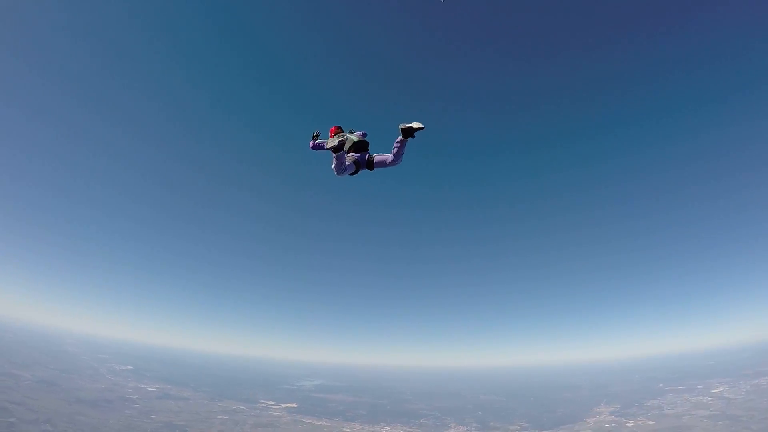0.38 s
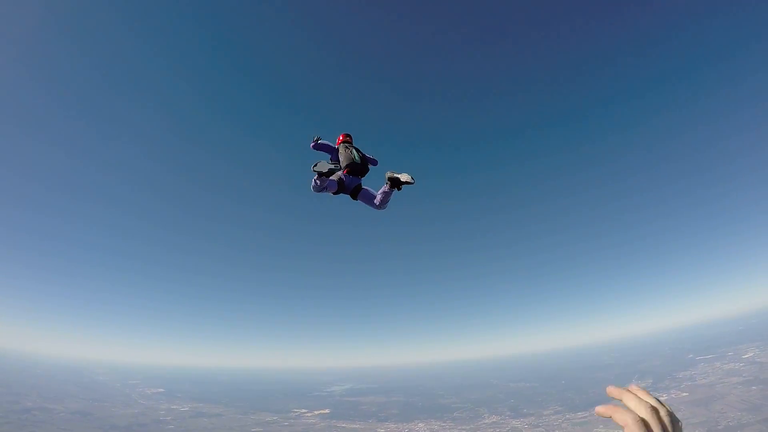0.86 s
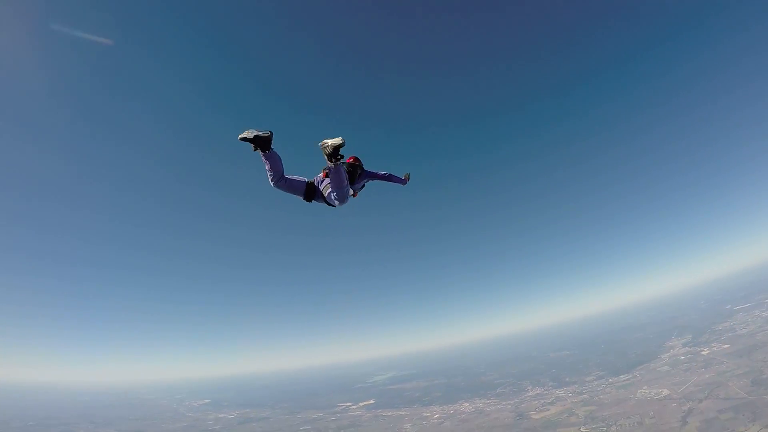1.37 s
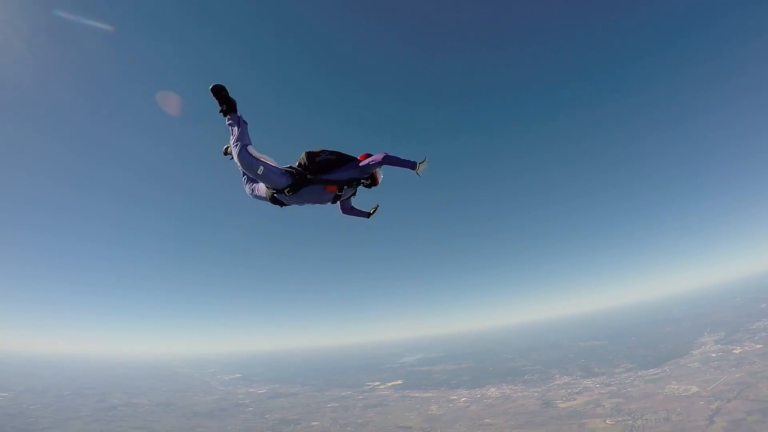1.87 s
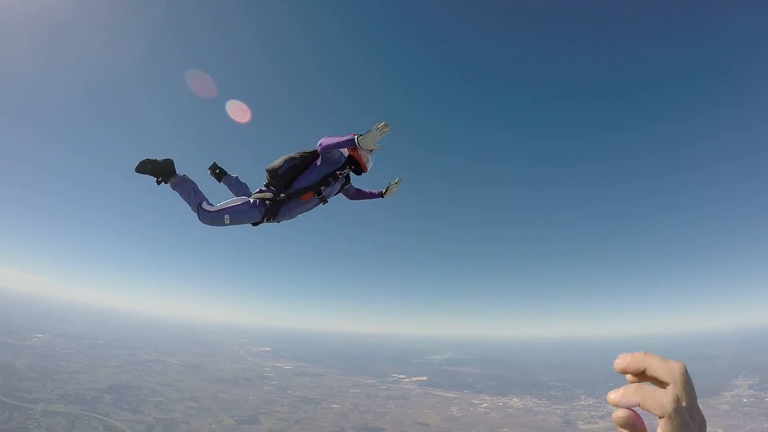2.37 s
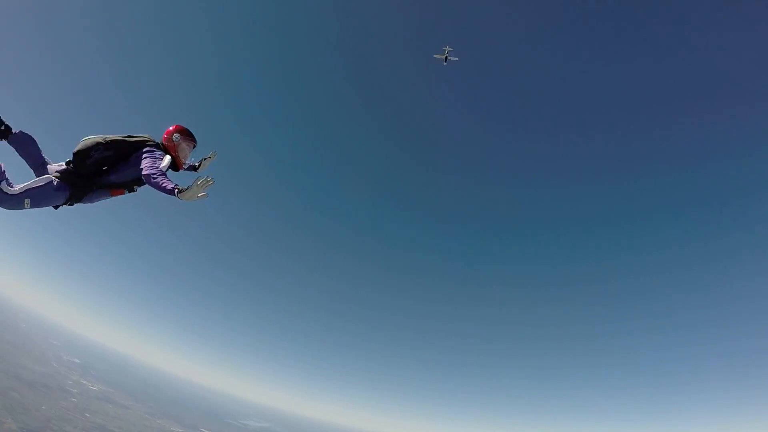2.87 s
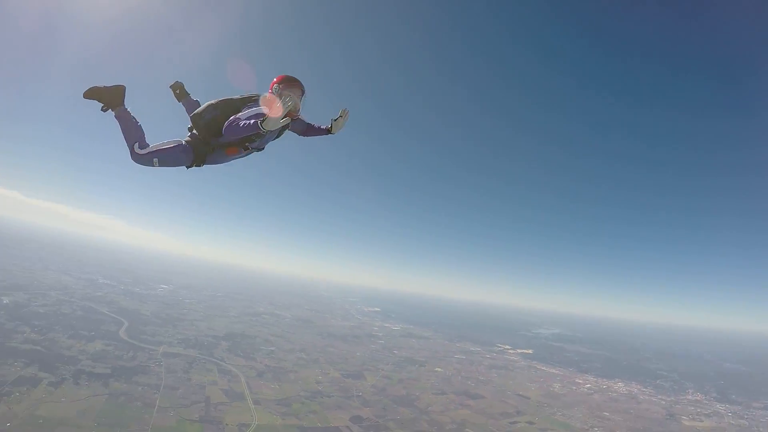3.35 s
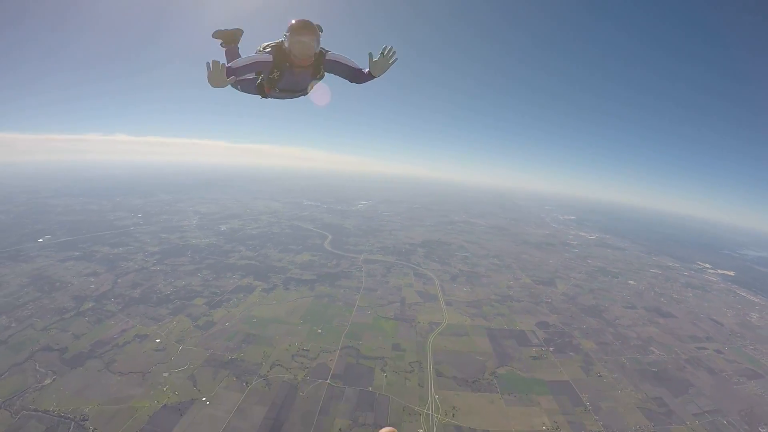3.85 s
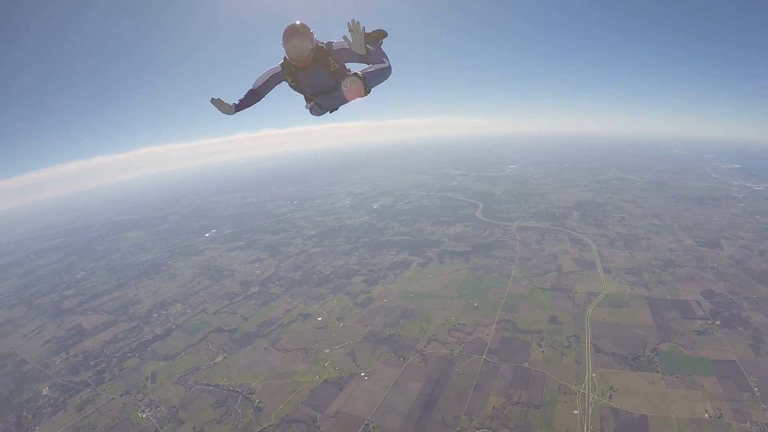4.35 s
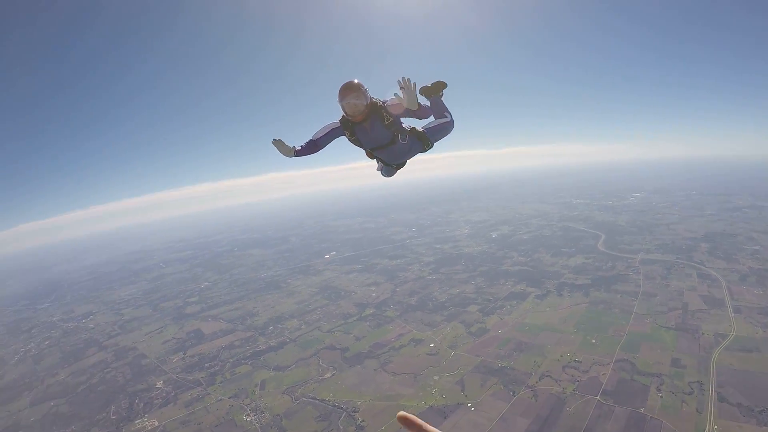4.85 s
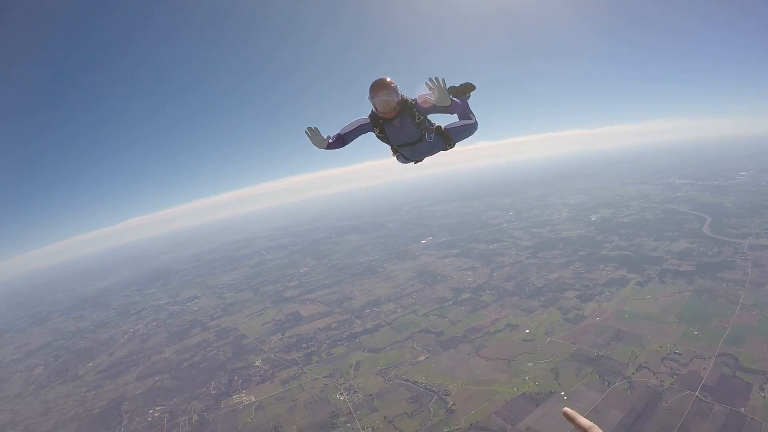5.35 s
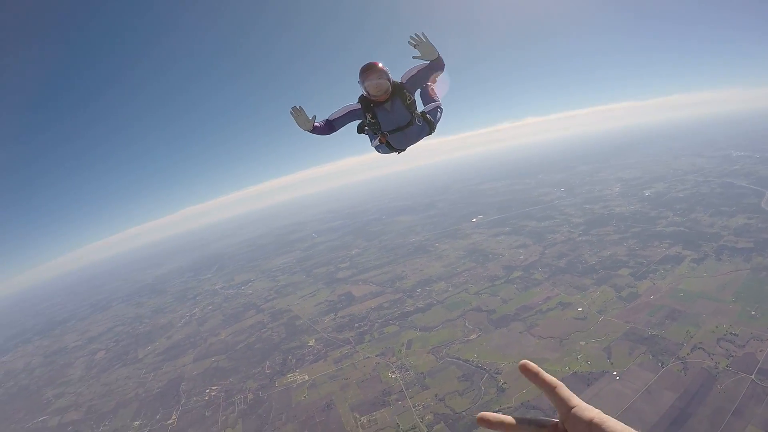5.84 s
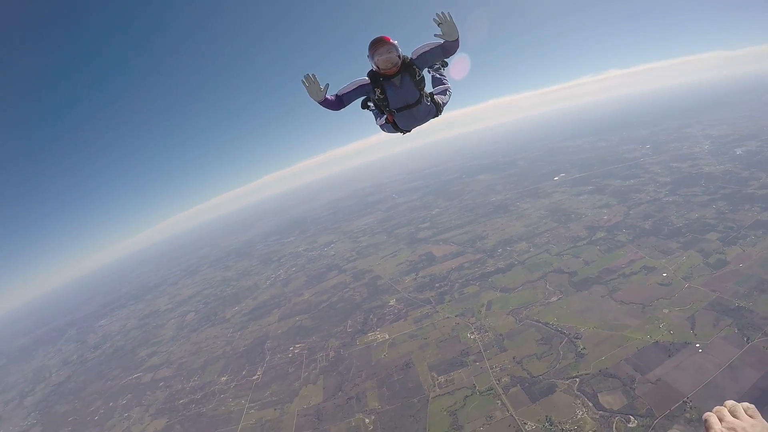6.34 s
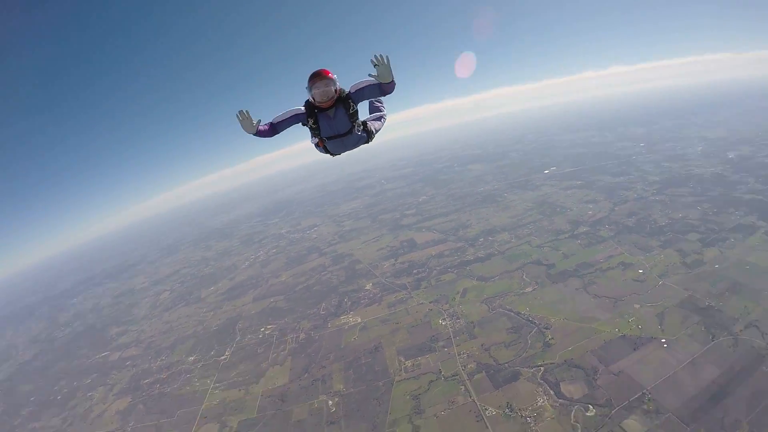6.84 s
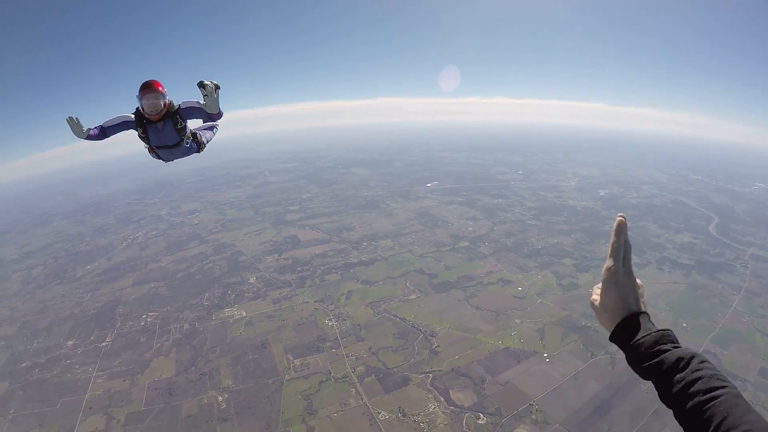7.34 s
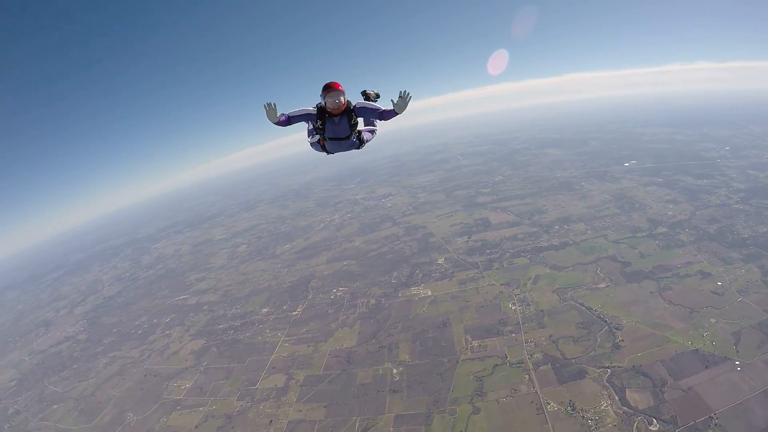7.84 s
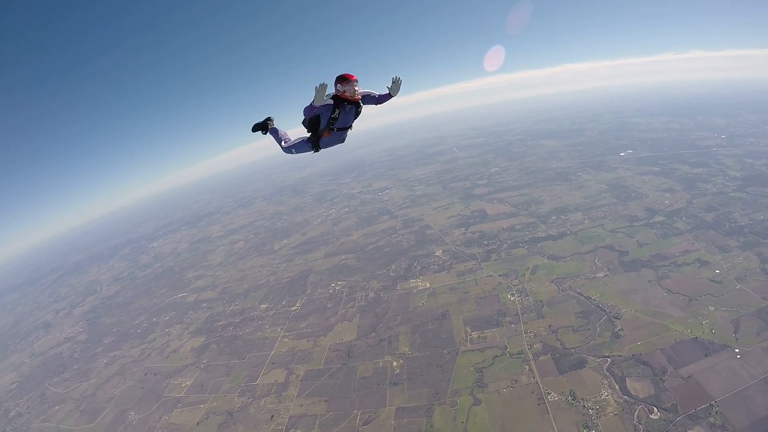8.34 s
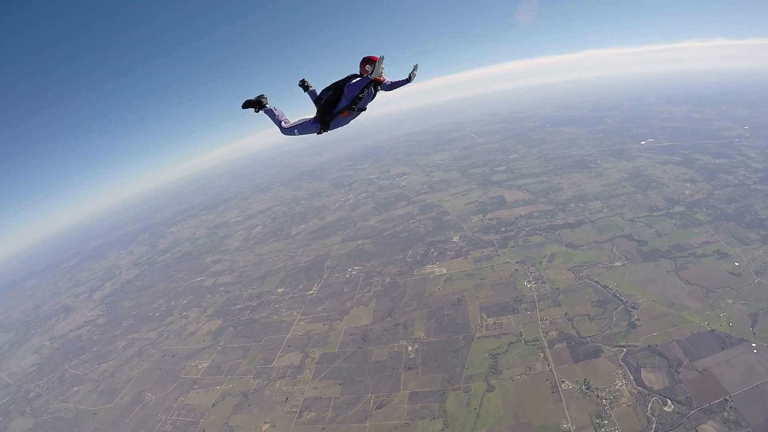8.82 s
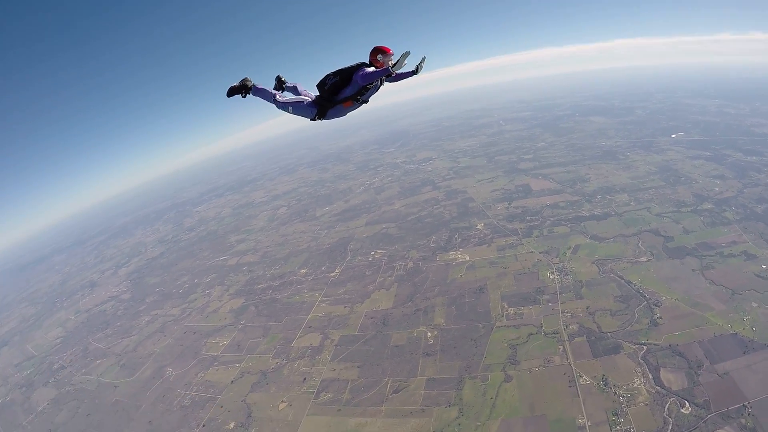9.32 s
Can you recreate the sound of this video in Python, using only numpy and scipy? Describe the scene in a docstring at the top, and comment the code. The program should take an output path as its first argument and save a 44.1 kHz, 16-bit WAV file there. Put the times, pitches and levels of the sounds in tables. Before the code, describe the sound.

Air at full falling speed pounds a close, unprotected microphone high in the open sky. A heavy low rumble carries a fluttering roar, rough midrange rush and fine hiss. The first second is fullest and brightest; a weaker spell follows, then gusts return. Short popping bursts crowd together throughout, with a sharp tearing peak near four seconds and no echo.

```python
"""Freefall: air at full speed tears over a helmet microphone. The stream begins strong, weakens after about
0.9 s, recovers near 2 s, then rises and sinks to the end, with brief calms all along. Noise shaped by random
eddies gives a deep rumble, a ragged roar and rush and a thin hiss; eddies breaking on the port add short
broadband bursts, the loudest tearing near 4 s. The preamplifier rounds off the largest swings."""
import sys
import numpy as np
from scipy import signal
from scipy.fft import rfft, irfft, next_fast_len
from scipy.io import wavfile
from scipy.ndimage import uniform_filter1d, map_coordinates

SR = 44100
rng = np.random.default_rng(int(sys.argv[2]) if len(sys.argv) > 2 else 0)


def transcribe(signal):
    """Save signal, clipped to [-1, 1], as a 16-bit WAV file at the path in sys.argv[1]."""
    frames = np.atleast_2d(signal).T
    limited = np.clip(frames, -1, 1)
    pcm = np.round(limited * 32767).astype(np.int16)
    wavfile.write(sys.argv[1], SR, pcm)


def volts_from_db(level):
    """Convert decibel levels to linear amplitude ratios."""
    exponent = np.asarray(level, float) / 20
    return 10 ** exponent


N = 416744  # samples


def unit(x):
    """Normalisation: the mean square is brought to 1."""
    return x / np.sqrt(np.mean(x ** 2) + 1e-20)


def wobble(rate):
    """Band-limited fluctuation: a smooth curve through random knots, rate of them a second."""
    knots = rng.standard_normal(int(N * rate / SR) + 4)
    return map_coordinates(knots, [np.arange(N) * rate / SR])


def along(rows):
    """Linear interpolation: one value per sample for each column after the time."""
    s, *columns = np.transpose(rows)
    return [np.interp(np.arange(N) / SR, s, column) for column in columns]


def ragged(shared, shared_db, own_db, own_rate):
    """Intermittency: a gain of rms 1 follows the common eddies and flutters on its own."""
    return unit(volts_from_db(shared_db * shared + own_db * wobble(own_rate)))


def turbulence(spectrum, envelope, jumps=0):
    """Spectral shaping: enveloped white noise plus jumps is filtered; rms 1 where the envelope is 1."""
    m = next_fast_len(N + 8192)
    hz, db = np.transpose(spectrum)
    log_hz = np.log(np.fft.rfftfreq(m, 1 / SR) + 1)
    gain = volts_from_db(np.interp(log_hz, np.log(hz + 1), db))
    source = envelope * rng.standard_normal(N) + jumps
    return irfft(rfft(source, m) * unit(gain), m)[:N]


# airstream on the port: t/s, strength/dB (its departure from the mean counts), hiss level/dB
FLOW = [(0.0, -20, -50), (0.13, -15.5, -47.5), (0.5, -15, -45), (0.79, -17, -49), (0.97, -27.5, -52),
        (1.13, -29.5, -58), (1.5, -30.5, -54.5), (1.76, -33, -55.5), (1.95, -25, -53.5),
        (2.08, -21.5, -49.5), (2.16, -19.5, -49.5), (2.37, -19, -48.5), (2.66, -25.5, -51),
        (2.82, -24.5, -50), (2.97, -32, -51), (3.1, -20.5, -47), (3.29, -25, -51), (3.55, -28, -50.5),
        (3.97, -19.5, -47.5), (4.13, -26.5, -52), (4.37, -23.5, -52.5), (4.71, -25, -50.5),
        (5.45, -19, -46.5), (5.69, -25, -49), (6.0, -25, -49.5), (6.34, -22.5, -49), (6.5, -27.5, -50.5),
        (7.0, -23, -49.5), (7.19, -22, -49.5), (7.95, -24, -49.5), (8.29, -30.5, -52.5), (8.89, -24.5, -50),
        (9.05, -24.5, -48.5), (9.45, -27.5, -51)]


def flow():
    """Common excitation: strength about its mean drives all layers but the hiss, which has its own level."""
    strength_db, hiss_db = along(FLOW)
    return strength_db - strength_db.mean(), hiss_db


# brief calms between eddies: middle t/s, depth/dB, length/s (width near half depth)
LULLS = [(0.017, -12.5, 0.011), (0.193, -4, 0.12), (0.421, -1.5, 0.051), (1.047, -3.5, 0.038),
         (1.137, -10, 0.024), (1.253, -5, 0.029), (1.869, -7, 0.054), (2.098, -6, 0.023),
         (2.381, -10.5, 0.024), (2.459, -9, 0.021), (2.528, -9, 0.013), (2.755, -4.5, 0.045),
         (3.097, -7, 0.094), (3.349, -13, 0.012), (3.443, -4, 0.013), (3.738, -12, 0.0094),
         (3.871, -4.5, 0.015), (4.192, -3, 0.034), (4.354, -5.5, 0.029), (4.449, -10, 0.026),
         (4.538, -6, 0.045), (4.762, -10, 0.023), (4.925, -10, 0.018), (5.184, -4, 0.015),
         (5.226, -8, 0.034), (5.512, -5.5, 0.074), (6.043, -5.5, 0.047), (6.355, -9.5, 0.021),
         (6.438, -1.5, 0.033), (6.61, -3.5, 0.044), (6.982, -8.5, 0.034), (7.172, -10, 0.0088),
         (7.2, -4, 0.014), (7.386, -5.5, 0.07), (7.432, -7, 0.025), (7.734, -10, 0.013),
         (7.968, -6.5, 0.017), (8.075, -12, 0.028), (8.165, -5, 0.018), (8.807, -4, 0.043),
         (9.346, -11, 0.014)]


def lulls():
    """Flow separation: the stream detaches from the port for a moment, a smooth dip in dB."""
    dip_db, t = np.zeros(N + SR), np.arange(-SR // 8, SR // 8) / SR
    for s, db, length in LULLS:
        dip = db * np.exp(-np.abs(1.73 * t / length) ** 3)
        dip_db[round(s * SR):][:len(t)] += dip
    return dip_db[SR // 8:][:N]


def follow(gust_db, swell, mean_db, slope, swell_db):
    """Power law: level at mean strength, dB per dB of strength, depth of the shared random swells in dB."""
    return mean_db + slope * gust_db + swell_db * swell


def ticks(count, rise, fall):
    """Shot noise: many small eddies at random moments, mostly weak, give a spiky curve with sharp fronts."""
    when, size = rng.random((count, 2)).T
    train = np.bincount((when * N).astype(int), -np.log(1 - size), N)
    t = np.arange(SR // 30) / SR
    pulse = np.exp(-t / fall) - np.exp(-t / rise)
    spiky = signal.fftconvolve(train, pulse)[:N]
    return unit(spiky - spiky.mean())


def eddy_lumps():
    """Eddy cascade: slow and fast fluctuations add up to lumps shared by all scales."""
    slow = 0.37 * wobble(25) + 0.5 * wobble(70)
    fast = 0.98 * wobble(200) + 1.06 * ticks(count=1500, rise=0.00056, fall=0.00086)
    return 2.26 * np.tanh(unit(slow + fast) / 1.55)  # the background lumps stay below the big bursts


# colour of the hiss: f/Hz, relative level/dB
HISS = [(2000, -7.5), (3200, -2), (5000, -2.5), (7300, -6.5), (8500, -12.5), (11000, -17), (14500, -23),
        (15600, -27)]


def hiss(hiss_db, calm_db, eddies, sizzle):
    """Fine-scale turbulence: the smallest eddies give a thin hiss, less affected by calms."""
    level_db = hiss_db + 0.5 + 0.52 * calm_db
    steady = volts_from_db(level_db) * ragged(eddies, 1.2, 0.45, 150)
    return turbulence(HISS, np.hypot(steady, sizzle))


# level of the brighter edge, most of all just after the exit: t/s, edge re rush/dB
EDGE_SHARE = [(0, -12), (.3, -5), (.5, -12.5), (.7, -10.5), (.95, -13.5), (1.5, -16), (2.3, -14), (3, -18),
              (3.8, -13.5), (5, -19), (6.5, -16.5), (8, -18.5), (9.45, -17)]
# colour of the edge: f/Hz, relative level/dB
EDGE = [(900, -35), (1350, 6), (2100, -4), (2600, -27), (3300, -47), (4500, -100)]


def edge(rush_db, eddies, wake):
    """Intermittent shear noise: the brighter edge of the rush, strongly modulated by the eddies."""
    share_db, = along(EDGE_SHARE)
    level = volts_from_db(share_db) * np.hypot(volts_from_db(rush_db), volts_from_db(-7.5) * wake)
    return turbulence(EDGE, level * ragged(eddies, 6.8, 2.1, 100))


# colour of the rush: f/Hz, relative level/dB
RUSH = [(350, -75), (620, -3.5), (1090, -4.5), (1400, -13), (1900, -26.5), (2600, -80), (4500, -110)]


def rush(rush_db, eddies, wake, thud, thud_jump):
    """Mid-scale turbulence: stream and wake add in power, with part of each thud on top."""
    background = np.hypot(volts_from_db(rush_db), volts_from_db(-14) * wake) * ragged(eddies, 2.77, 1.44, 80)
    return turbulence(RUSH, np.hypot(background, volts_from_db(-5.5) * thud), volts_from_db(-6.5) * thud_jump)


# colour of the roar: f/Hz, relative level/dB
ROAR = [(70, -14), (125, -3), (300, -7.5), (600, -15), (850, -66), (1600, -85)]


def roar(roar_db, weight_db, eddies, wake, thud, thud_jump):
    """Turbulent pressure noise: a ragged roar carries the thuds of the breaking eddies."""
    background = np.hypot(volts_from_db(roar_db), volts_from_db(-6.5) * wake) * ragged(eddies, 2.82, 1.73, 35)
    envelope = volts_from_db(weight_db) * np.hypot(background, volts_from_db(3.5) * thud)
    return turbulence(ROAR, envelope, volts_from_db(weight_db + 4.0) * thud_jump)


# colour of the rumble: f/Hz, relative level/dB
RUMBLE = [(4.7, -35), (8.0, -3), (49, 4.5), (78, 1.5), (170, -12.5), (220, -27), (370, -120)]


def rumble(rumble_db, eddies, wake):
    """Large-scale buffeting: only the slow part of the eddies modulates the deep noise."""
    slow_eddies = uniform_filter1d(eddies, size=800)
    level = np.hypot(volts_from_db(rumble_db), volts_from_db(-2) * wake)
    return turbulence(RUMBLE, level * ragged(slow_eddies, 1.53, 0.44, 14))


# colour of the tearing: f/Hz, relative level/dB
TEARING = [(1200, 4.5), (1900, 8), (3000, 1.5), (4500, -7), (6000, -17.5), (9000, -74)]


def tearing(tear_db, eddies, high_wake, tear, tear_jump):
    """Small-scale breakup: bursts of broadband noise stand over a fluttering background."""
    background = np.hypot(volts_from_db(tear_db), high_wake) * ragged(eddies, 3.24, 2.2, 300)
    return turbulence(TEARING, np.hypot(background, tear), tear_jump)


def random_bursts(gust_db, count):
    """Random arrivals: a few more eddies at random moments, louder in a stronger stream."""
    when = rng.random(count) * (N - 1) / SR
    z = rng.standard_normal((count, 2))
    tear_db = -36 + gust_db[(when * SR).astype(int)]
    thud_re_tear_db = 13.5 + 3 * z[:, 0]
    length_s = 0.0104 * np.exp(1.06 * z[:, 1])
    return np.transpose([when, tear_db, thud_re_tear_db, length_s])


# eddies breaking on the port, strong and weak: front t/s, tear level/dB, thud re tear/dB, length/s
BURSTS = [(0.08, -37, 17, 0.0073), (0.1157, -24.5, 17.5, 0.0035), (0.1294, -39, 3, 0.0016),
          (0.1496, -30, 11, 0.0027), (0.174, -35, 18.5, 0.0036), (0.2693, -21.5, 11.5, 0.0023),
          (0.288, -27, -4, 0.0028), (0.293, -24.5, 17.5, 0.0034), (0.3155, -20.5, 8, 0.0038),
          (0.332, -27.5, 17.5, 0.0044), (0.349, -34, 9, 0.0076), (0.373, -26.5, 12, 0.0034),
          (0.387, -28, 11, 0.0046), (0.4055, -32, 15, 0.0046), (0.4609, -28, 5, 0.0022),
          (0.493, -29, 9, 0.0032), (0.512, -39, 9, 0.0025), (0.552, -22.5, 15, 0.0016),
          (0.565, -31, 17, 0.0044), (0.598, -23, 19, 0.0025), (0.622, -33, 22, .005),
          (0.6459, -26, 6, 0.0031), (0.655, -27.5, 5, 0.011), (0.6848, -32, 9, .005),
          (0.711, -29, 15, 0.0032), (0.7327, -30, 13, .004), (0.7916, -38, 11, 0.0029),
          (0.826, -32, 15, 0.0035), (0.8739, -27, 16.5, 0.0032), (0.899, -27.5, 14.5, 0.0041),
          (0.969, -29, 14.5, 0.0051), (0.9854, -29.5, 12, 0.0049), (1.07, -38, 11, .003),
          (1.1149, -32.5, 10, 0.0036), (1.1625, -33.5, 11, 0.00606), (1.279, -30.5, 13, 0.0049),
          (1.3, -35, 14, 0.0058), (1.3437, -33.5, 13, 0.0044), (1.3602, -26.5, 13.5, 0.0046),
          (1.396, -36, 10, 0.0051), (1.408, -37, 16.5, 0.0037), (1.479, -31, 13.5, 0.0041),
          (1.5234, -43, 14.5, 0.0057), (1.5434, -29, 13.5, 0.0049), (1.56, -37.5, 20, 0.0057),
          (1.58, -44, 17, 0.006), (1.695, -36, 13.5, 0.0042), (1.712, -43.5, 17, .005),
          (1.82, -33.5, 12, 0.0028), (1.9205, -35.5, 13, 0.0045), (1.955, -30, 12.5, 0.0065),
          (2.01, -24.5, 7, 0.0061), (2.0827, -31.5, 10, 0.0037), (2.155, -37, 6, 0.0058),
          (2.176, -23.5, 11.5, 0.0049), (2.2283, -30.5, 9, .006), (2.286, -24, 13, 0.0043),
          (2.32, -35, 10, 0.0076), (2.3665, -26, 12, 0.0024), (2.4026, -30.5, 17.5, 0.005),
          (2.4982, -34, 13, 0.0032), (2.5207, -33.5, 16.5, 0.0042), (2.5511, -36, 7, 0.0022),
          (2.58, -34.5, 19, 0.0055), (2.638, -29.5, 13, 0.0062), (2.66, -30, 16, 0.005),
          (2.68, -30.5, 14, .004), (2.7806, -35.5, 15.5, 0.0095), (2.828, -29, 11.5, 0.00434),
          (2.8863, -34, 10, 0.005), (2.976, -29.5, 15, 0.0059), (3.01, -27, 13.5, 0.01),
          (3.135, -32, 14, 0.004), (3.1702, -30, 8, 0.0032), (3.1961, -32.5, 16, 0.0028),
          (3.222, -37.5, 21, .007), (3.2784, -29, 18.5, 0.0019), (3.3159, -33.5, 17, 0.0048),
          (3.37, -27.5, 12, 0.0032), (3.4176, -29.5, 17, 0.0055), (3.484, -29.5, 8.5, 0.0082),
          (3.585, -34, 13.5, 0.0091), (3.6114, -33.5, 18.5, 0.0056), (3.6431, -30.5, 14.5, 0.0056),
          (3.685, -28.5, 12, 0.0065), (3.755, -32.5, 16.5, 0.0063), (3.8262, -32, 14, 0.0038),
          (3.8571, -35, 10, 0.0045), (3.897, -31, 13, 0.0053), (3.91, -33, 10, 0.0032),
          (3.932, -30, 13, 0.0038), (3.9459, -30, 16.5, 0.0031), (3.954, -20, 8, 0.00466),
          (3.9646, -18, 6, 0.00354), (3.9948, -28, 8, 0.0068), (4.017, -28, 16.5, 0.0047),
          (4.0462, -33.5, 14.5, .004), (4.076, -41, 14, 0.0091), (4.09, -36.5, 21, 0.008),
          (4.128, -28, 12, 0.0025), (4.152, -33.5, 16.5, 0.0045), (4.1994, -34, 17, 0.0031),
          (4.317, -32, 1, 0.0044), (4.3869, -30, 9.5, 0.0044), (4.4233, -32.5, 11, 0.0035),
          (4.49, -36, 16, 0.0067), (4.581, -37.5, 21.5, 0.004), (4.699, -30.5, 13, 0.011),
          (4.7195, -28, 11.5, 0.0041), (4.858, -28, -4, 0.0043), (4.914, -35, 10.5, 0.0035),
          (4.949, -29, 11, 0.003), (4.9626, -22, 10.5, 0.0059), (5.034, -31, 18, 0.0064),
          (5.0834, -25.5, 17, 0.0064), (5.1103, -37.5, 8, 0.012), (5.183, -33.5, 18, 0.0026),
          (5.268, -26, 10, 0.012), (5.3472, -32.5, 17, 0.0064), (5.4, -28, 14, 0.0064),
          (5.436, -21.5, -2, 0.0037), (5.4765, -44, 14, 0.0055), (5.505, -34, 14, 0.0047),
          (5.5777, -30, 17.5, 0.0039), (5.587, -26, 15, 0.0063), (5.6165, -28, 6, 0.0038),
          (5.6421, -34, 0, 0.0025), (5.7678, -35, 20, 0.0049), (5.923, -21.5, 12.5, 0.0064),
          (5.947, -35.5, 15, .006), (6.003, -32, 5, .004), (6.0935, -31.5, 8, 0.0069),
          (6.1384, -30, 6, 0.005), (6.232, -32, 13, 0.0062), (6.2971, -33, -1, 0.0042),
          (6.332, -27.5, 10.5, 0.00614), (6.3789, -22, 9.5, 0.00366), (6.41, -30, 9, 0.00425),
          (6.485, -30.5, 13.5, 0.0022), (6.538, -24, 7, 0.0039), (6.548, -29, 11, 0.012),
          (6.6942, -27.5, 10, 0.0027), (6.7143, -28.5, 16.5, 0.0061), (6.776, -28.5, 8, 0.0044),
          (6.8, -30.5, 4, 0.0076), (6.8186, -30.5, 18.5, 0.0029), (6.917, -29, 11, 0.0053),
          (6.9441, -28, 8, 0.0032), (6.9855, -30.5, 9, 0.0036), (7.03, -34, 17, 0.0062),
          (7.0638, -30, 15, 0.00454), (7.097, -29.5, 13, 0.0077), (7.1816, -33.5, 19, 0.0039),
          (7.228, -29.5, 14.5, 0.0045), (7.2553, -29.5, 16.5, 0.0045), (7.282, -27.5, 12.5, .004),
          (7.3302, -33.5, 12, 0.0101), (7.4056, -28.5, 8.5, 0.0066), (7.4445, -36, 15.5, .006),
          (7.497, -32, 17, 0.0106), (7.5413, -32, 6, .003), (7.5847, -25.5, 7, 0.00585),
          (7.6076, -39, 5, 0.0067), (7.64, -26, 14, 0.0021), (7.7223, -35, 10, 0.0035),
          (7.7488, -32, 6, 0.0028), (7.7992, -29.5, 4, 0.00515), (7.845, -33, 9.5, 0.0043),
          (7.8947, -31.5, 14, 0.0056), (8.0413, -26, 10, 0.012), (8.1125, -33, 6, 0.0032),
          (8.1375, -23, 7.5, 0.0056), (8.185, -37.5, 16, 0.0074), (8.2811, -36, 15, 0.0059),
          (8.319, -30, -3, 0.0049), (8.352, -37, 8, 0.0046), (8.4711, -32, 17.5, 0.0054),
          (8.527, -25, 14, 0.0038), (8.563, -34, 17, 0.0035), (8.7091, -36, 19.5, 0.0029),
          (8.8548, -25, 10, 0.0053), (8.8843, -21.5, 15, 0.0012), (8.9055, -20.5, 18, 0.0014),
          (8.9225, -27, 11, 0.0069), (9.032, -25.5, 6.5, 0.0032), (9.0623, -21.5, 9, 0.0018),
          (9.0992, -25.5, 12, 0.0043), (9.1324, -27.5, 11, 0.0061), (9.228, -36.5, 22, 0.0078),
          (9.2534, -29.5, 12.5, 0.0027), (9.2664, -30.5, 16, 0.0031), (9.2978, -31, 11, .004),
          (9.3307, -30, 13, .004), (9.361, -28.5, 17, 0.0048), (9.409, -25.5, 10.5, 0.005),
          (9.422, -33.5, 19, 0.0034)]
# steepness of rise over fall [ratio], one each for: thud, tear, sizzle, low wake, high wake
FRONT = [1.54, 1.15, 1.16, 1.3, 1.2]


def bursts(rows):
    """Impulsive loading: eddies swell, jump in pressure at the peak and fall, each within a longer wake."""
    lead = SR // 12
    steepness = np.array(FRONT)[:, None]
    spread = np.array([[.55], [.4], [.3], [2.5], [2.5]])  # small scales are briefer, wakes longer
    snap = np.array([0.68, 0.38])  # share of thud and tear amplitude in the jump
    t = (np.arange(2 * lead) - lead) / SR
    envelopes, jumps = np.zeros((5, N + SR)), np.zeros((2, N + SR))
    for (s, db, thud_db, length), (z, side) in zip(rows, rng.standard_normal((len(rows), 2))):
        length = np.clip(length, .001, .012)
        u = t / length / spread
        level = volts_from_db(db + np.array([[thud_db], [0], [-12 + 2 * z], [thud_db], [-12.5]]))
        power = (level * 2 / (np.exp(-steepness * u) + np.exp(u))) ** 2
        peak = round((s + 0.3184 * length) * SR)  # the peak follows the front
        # the jump has the same sign in thud and tear
        jumps[:, peak] += np.sign(side) * snap * np.sqrt(power[:2].sum(axis=1))
        power[:2] *= 1 - snap[:, None] ** 2
        envelopes[:, peak:][:, :len(t)] += power  # overlapping eddies add in power
    return np.sqrt(envelopes[:, lead:N + lead]), jumps[:, :N]


# changing tone of the wind: t/s, rumble weight/dB, roar weight/dB, tearing weight/dB
WIND_TONE = [(0, 1.5, -2.5, -7), (.3, -1.5, -2.5, -5), (.6, -3.5, -3.5, -5), (.85, 0, -2, -5.5),
             (1.2, -1.5, 1.5, 2), (1.48, 2.5, 0, -3), (1.57, 1.5, 7.5, -6), (1.68, 0.5, 5, 1),
             (1.95, 2, 0, 2), (2.3, -2, -1.5, -1.5), (2.6, -1, 0.3, 1.5), (3.4, -1.5, 0.5, 2.5),
             (3.95, 0.5, 0, 1), (4.09, -4.5, 3.5, 2), (4.3, 0, 0.5, 2.5), (4.75, 0, -1, 1),
             (5.3, 0.5, -2.5, 0), (6.5, 0.6, 0, 2), (7.5, 0, -0.5, 1.5), (8.1, 0, 0.3, 0.5),
             (8.6, 0.5, -1, 0), (9.45, -1.5, 2, -3)]


def wind():
    """Turbulent intermittency: all small scales swell together, in lumps, as the stream varies."""
    gust_db, hiss_db = flow()
    calm_db = lulls()
    gust_db = gust_db + calm_db
    swell = wobble(14)
    eddies = eddy_lumps()
    rumble_weight_db, roar_weight_db, tear_weight_db = along(WIND_TONE)

    rumble_db = follow(gust_db, swell, -13, 0.3, 0.94) + rumble_weight_db
    rumble_db = rumble_db + 0.12 * calm_db  # drops further in a calm
    roar_db = follow(gust_db, swell, -21, 1, 0.74)
    rush_db = follow(gust_db, swell, -28.5, 0.86, 0.61)
    tear_db = follow(gust_db, swell, -41.5, 0.68, 1) + tear_weight_db
    tear_db = tear_db + 0.2 * calm_db + 0.41 * (hiss_db - hiss_db.mean())  # follows calms and hiss too

    rows = np.vstack([BURSTS, random_bursts(gust_db, count=12)])
    (thud, tear, sizzle, wake, high_wake), (thud_jump, tear_jump) = bursts(rows)
    low = rumble(rumble_db, eddies, wake) + roar(roar_db, roar_weight_db, eddies, wake, thud, thud_jump)
    middle = rush(rush_db, eddies, wake, thud, thud_jump) + edge(rush_db, eddies, wake)
    high = tearing(tear_db, eddies, high_wake, tear, tear_jump) + hiss(hiss_db, calm_db, eddies, sizzle)
    return low + middle + high


def scene():
    """Superposition: one microphone in the airstream receives the sum of all layers."""
    return wind()[None]


def preamplifier(dry):
    """Soft saturation: swings near full scale are rounded off towards a ceiling."""
    top, hardness = .93, 6
    return dry / (1 + np.abs(dry / top) ** hardness) ** (1 / hardness)


def roll_off(x):
    """The treble ends steeply here."""
    return signal.sosfilt(signal.butter(12, 15600, fs=SR, output="sos"), x)


def record(dry):
    """Recording chain: the saturated microphone signal is the finished mix."""
    mix = preamplifier(dry)
    return roll_off(mix)


dry = scene()
out = record(dry)
transcribe(out)
```